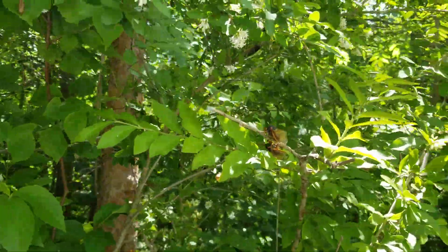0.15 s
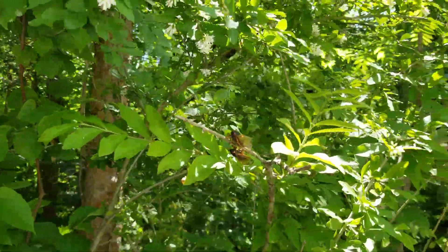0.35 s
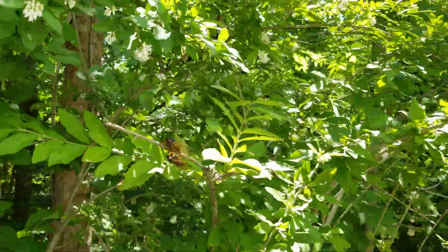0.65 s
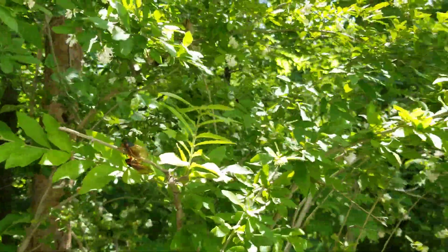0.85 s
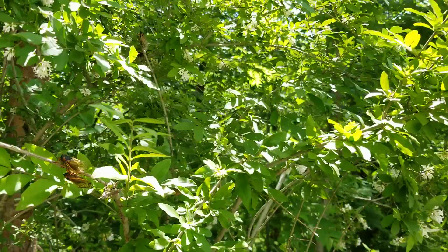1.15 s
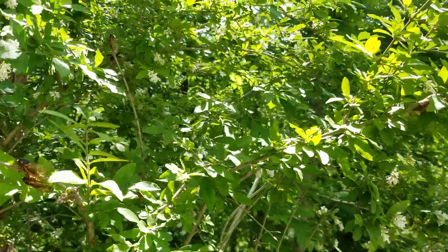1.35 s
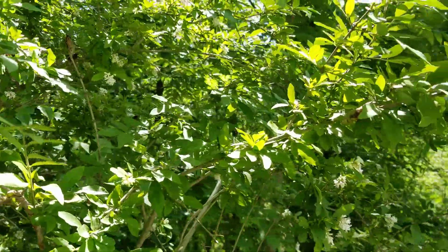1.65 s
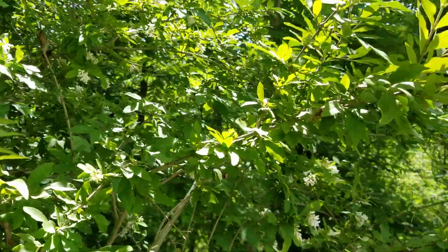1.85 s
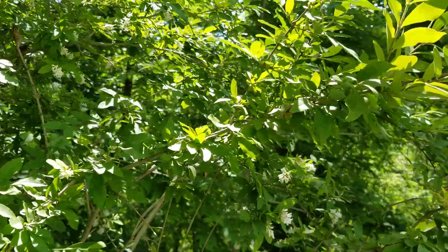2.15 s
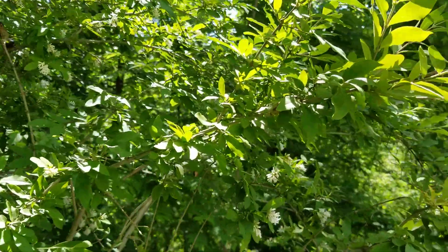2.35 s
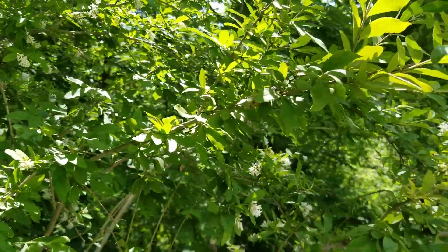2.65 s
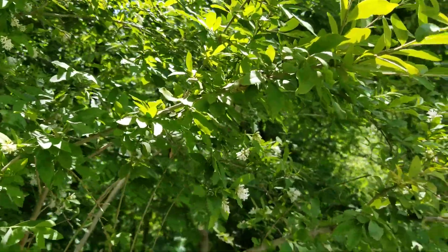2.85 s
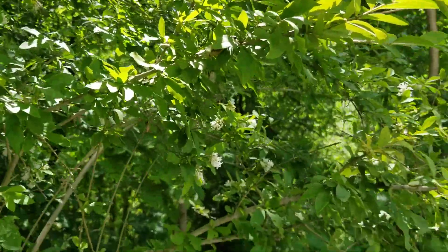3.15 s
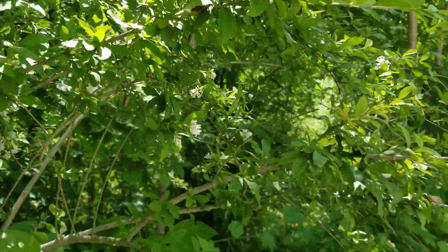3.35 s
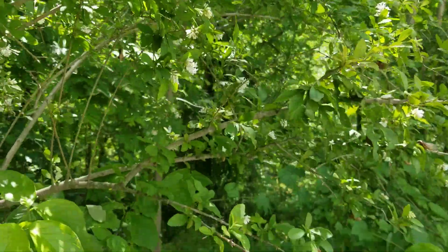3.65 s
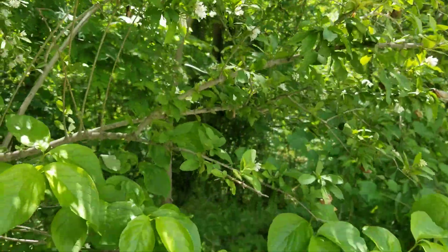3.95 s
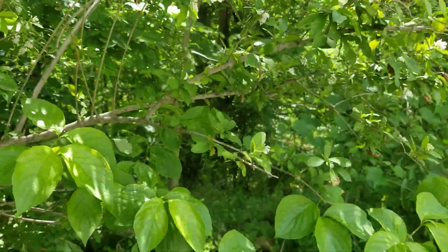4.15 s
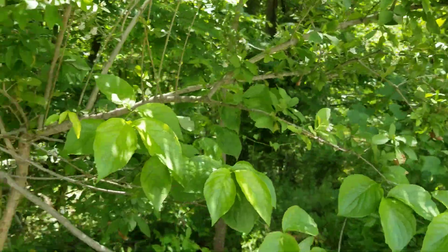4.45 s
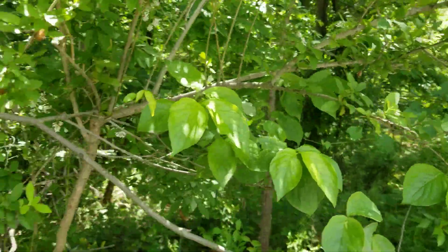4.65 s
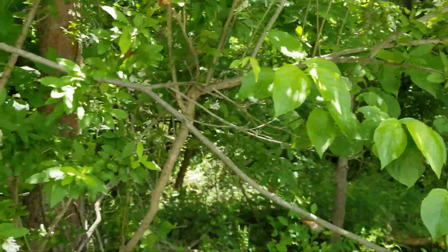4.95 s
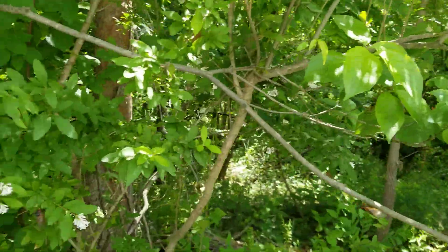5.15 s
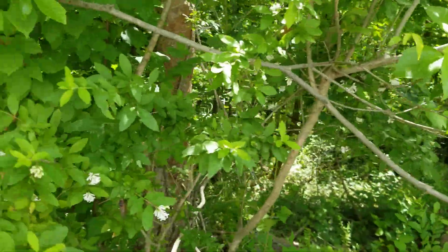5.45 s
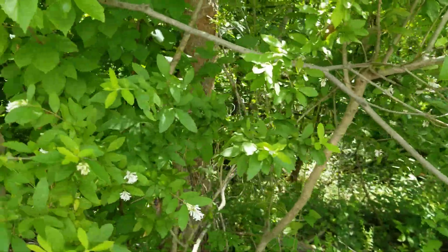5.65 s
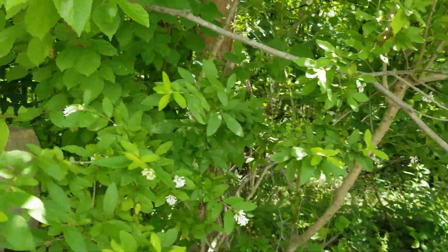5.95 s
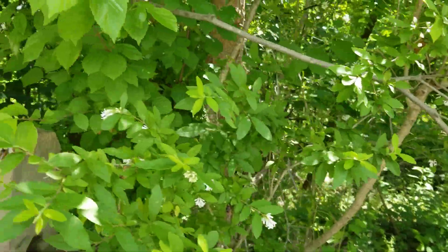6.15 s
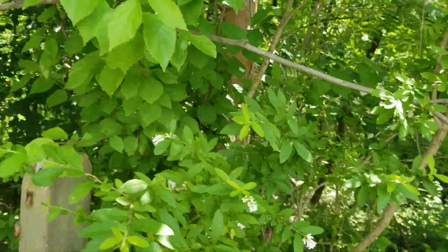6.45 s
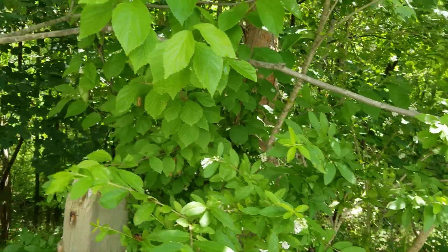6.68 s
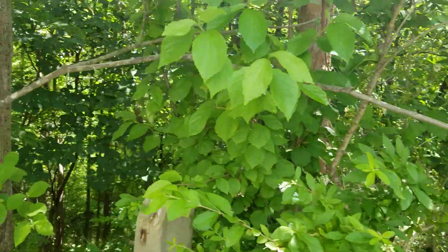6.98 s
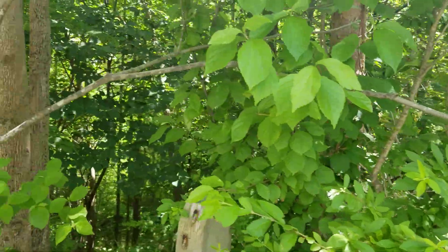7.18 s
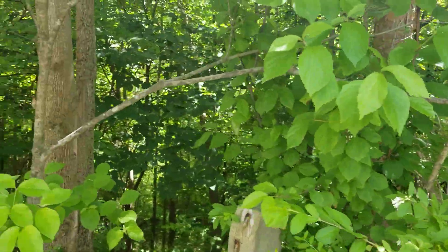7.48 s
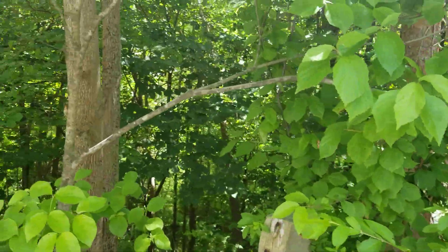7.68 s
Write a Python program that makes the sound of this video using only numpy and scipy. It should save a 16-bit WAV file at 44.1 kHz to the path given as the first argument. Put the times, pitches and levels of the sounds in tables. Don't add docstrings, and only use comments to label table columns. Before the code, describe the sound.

Summer woods drone with massed cicadas, high and hissy above a steady low hum, while single insects rasp upward and distant road noise slowly grows.

```python
import sys
import numpy as np
from scipy import signal
from scipy.fft import rfft, irfft
from scipy.io import wavfile
from scipy.ndimage import uniform_filter1d

SR = 44100
rng = np.random.default_rng(int(sys.argv[2]) if len(sys.argv) > 2 else 0)


def how_loud(loudness_db):
    steps = np.asarray(loudness_db, float) / 20
    return 10 ** steps


def inscribe(sig):
    pcm = np.round(np.clip(np.atleast_2d(sig).T, -1, 1) * 32767)
    wavfile.write(sys.argv[1], SR, pcm.astype(np.int16))


N = 344862


def evened(x):
    return x / np.sqrt(np.mean(abs(x) ** 2) + 1e-20)


def read(points, hz):
    f, value = np.transpose(points)
    return np.interp(np.log(hz + 1), np.log(f + 1), value)


def played(rows, t):
    s, *columns = np.transpose(rows)
    return [np.interp(t, s, column) for column in columns]


def panned(db):
    return how_loud(np.array([db / 2, -db / 2]))


def resonate(x, hz, width_hz):
    turn = np.exp(2j * np.pi * np.cumsum(hz * np.ones(len(x))) / SR)
    r = np.exp(-np.pi * width_hz / SR)
    smooth = signal.lfilter([(1 - r) ** 2], [1, -2 * r, r * r], x / turn)
    return 2 * (turn * smooth).real


def surround(colour_db, patchy_db, patch_hz, patch_s, size=1024):
    port_gap_m, lean = 0.141, 0.13
    hop = size // 4
    hz = np.fft.rfftfreq(size, 1 / SR)
    frames = N // hop + 5
    a, b, c, d, patches = rng.standard_normal((frames, len(hz), 5)).T
    patches = uniform_filter1d(patches, max(1, round(patch_hz * size / SR)), axis=0)
    patches = evened(uniform_filter1d(patches, max(1, round(patch_s * SR / hop)), axis=1))
    side = np.cos(np.linspace(0, np.pi, 64))
    lag = 2 * np.pi * hz[:, None] * port_gap_m / 343 * side
    same = 0.98 * np.mean((1 + lean * side) * np.exp(1j * lag), 1, keepdims=True)
    left = a + 1j * b
    right = same * left + np.sqrt(1 - np.minimum(abs(same), 1) ** 2) * (c + 1j * d)
    field_db = colour_db(hz[:, None], np.arange(frames) * hop / SR) + patchy_db * patches
    spectrum = np.array([left, right]) * how_loud(field_db)
    return evened(signal.istft(spectrum, nperseg=size, noverlap=size - hop)[1][:, :N])


def traffic(t):
    # (time [s], level [dB])
    nearing = [(0.0, -46), (1.9, -46.5), (2.9, -43.5), (4.6, -42.5), (6.1, -42), (6.8, -41), (7.1, -37.5),
               (7.82, -38)]
    # (frequency [Hz], level [dB per Hz])
    rumble_body = [(20, -28), (35, -29), (48, -5.5), (62, -7), (77, -1.5), (100, -5), (125, -8), (200, -13),
                   (300, -21), (500, -32), (900, -90)]
    # (frequency [Hz], level [dB per Hz])
    hiss_body = [(150, -16.5), (300, -3), (500, -8), (800, -0.5), (1100, -0.5), (1800, -4), (3000, -16),
                 (6000, -15), (16000, -32.5)]
    rumble_db, = played(nearing, t)
    hiss_db = -42.5 + 0.45 * (rumble_db - rumble_db[0])
    rumble = surround(lambda hz, s: read(rumble_body, hz), patchy_db=1.2, patch_hz=30, patch_s=0.3, size=4096)
    hiss = surround(lambda hz, s: read(hiss_body, hz), patchy_db=0.58, patch_hz=300, patch_s=0.11)
    return how_loud(rumble_db) * rumble + how_loud(hiss_db) * hiss


def low_chorus(t):
    # (time [s], level [dB])
    waver = [(0.0, -35), (2.2, -35.5), (3.3, -36.5), (4.0, -34.5), (4.8, -37.5), (5.6, -36), (6.6, -36.5),
             (7.82, -33)]
    # (frequency [Hz], level [dB per Hz])
    body = [(560, -37.5), (950, -21.5), (1070, -16), (1290, 1.5), (1330, 6), (1380, -2), (1460, -7),
            (1620, -19.5), (1900, -30), (2470, -32), (4180, -120)]
    level_db, = played(waver, t)
    hum = surround(lambda hz, s: read(body, hz), patchy_db=-1.0, patch_hz=60, patch_s=0.2)
    return how_loud(level_db + 4.0) * panned(0.7)[:, None] * hum


def shrill_chorus(t):
    # (time [s], level [dB])
    swell = [(0.0, -44), (1.3, -43), (1.7, -43.5), (2.15, -44), (2.7, -45.5), (3.8, -45), (4.62, -43.5),
             (4.85, -48), (5.5, -47.5), (6.15, -49.5), (7.0, -48), (7.7, -45.5), (7.82, -46.5)]
    # (frequency [Hz], level [dB per Hz])
    body = [(1650, -38.5), (2800, -26), (3210, -20.5), (4040, -5.5), (4470, -7), (5310, -2), (5740, 0.5),
            (6390, -2), (9160, -32.5), (12300, -23), (15600, -38.5)]
    level_db, = played(swell, t)

    def colour_db(hz, s):
        return read(body, hz) - np.clip((hz - 8000) / 2500, 0, 1)

    band = surround(colour_db, patchy_db=0.72, patch_hz=400, patch_s=0.12)
    return how_loud(level_db + 17.0) * panned(-1)[:, None] * band


def ticks():
    # (time [s], peak level [dB], left-right difference [dB])
    taps = [
        (2.6181, -38, 10),
        (3.9669, -37, 5.5),
        (6.2811, -26, 9),
    ]
    out = np.zeros((2, N))
    t = np.arange(200) / SR
    for (s, db, pan_db), crack in zip(taps, rng.standard_normal((len(taps), 200))):
        tick = crack * np.exp(-t / 0.0012)
        out[:, round(s * SR):][:, :200] += how_loud(db - 6) * panned(pan_db - 1.0)[:, None] * tick
    return out


TAIL_S = 0.28


def posture(t, length, peak_db, top_hz):
    lift_s, drop_s = 0.34, 0.059
    rest_hz, rest_db = 4520, -10.5
    after = np.maximum(t - length, 0)
    rising = 1 - np.exp(-np.minimum(t, length) / lift_s)
    dropping = np.exp(-after / drop_s)
    lift = rising * dropping
    effort_db = peak_db - 20.5 * np.exp(-t / 0.054) - 2.5 * np.exp(-t / lift_s) - 64 * after
    beats = 204.0 * (1 - 0.04 * t - 0.088 * (1 - dropping))
    sac_hz = rest_hz + (top_hz - rest_hz) * lift
    return effort_db, sac_hz, beats, rest_db + 20 * lift


def cicada(start, length, peak_db, top_hz, rib_hz, rough):
    t = np.arange(0, length + TAIL_S, 1 / SR)
    effort_db, sac_hz, beats, sac_db = posture(t, length, peak_db, top_hz)
    jitter, noise, sizes = rng.standard_normal((3, 2 * SR))[:, :len(t)]

    snaps = 2 * np.cumsum(beats * (1 + 0.0564 * uniform_filter1d(jitter, 200))) / SR
    nth = (snaps + 0.6).astype(int)
    strength = np.where(nth % 2, -0.12, 1) * how_loud(1.0 * sizes[nth])
    clicks = evened(strength * np.exp(-((snaps % 1 - 0.5) / 0.009) ** 2))
    rasp = evened(strength * (0.2 + np.exp(-((snaps + 0.5) % 1) / 0.46)) * noise)
    drive = evened(np.diff(clicks, prepend=0)) + rough * rasp

    def ring(x, hz, width_hz):
        return evened(resonate(resonate(x, hz, width_hz), hz, width_hz))

    ribs = ring(drive, np.minimum(rib_hz, sac_hz), width_hz=1340)
    between = ring(drive, (rib_hz + sac_hz) / 2, width_hz=1540)
    sac = ring(drive, sac_hz, width_hz=710)
    overtone = ring(rasp, np.maximum(1.96 * sac_hz, 11300), width_hz=3100)
    edge = ring(rasp, 14700, width_hz=4300)

    dip = how_loud(-2.5) * np.clip((sac_hz - rib_hz) / 1000, 0, 1) * between
    sac_voice = sac + how_loud(-17.5) * overtone + how_loud(-23.5) * edge
    voice = ribs - dip + how_loud(sac_db) * sac_voice
    out = np.zeros(N)
    out[round(start * SR):][:len(t)] = how_loud(effort_db - 7.5) * voice / np.sqrt(1 + how_loud(2 * sac_db))
    return out


def foliage(x, pan_db, wet_db, t60):
    t = np.arange(12000) / SR
    path = rng.standard_normal((2, 12000)) * how_loud(-60 * t / t60) * np.clip(t / 0.0031, 0, 1)
    path *= how_loud(wet_db) / np.linalg.norm(path, axis=1, keepdims=True)
    path[[0, 1], [17, 0]] = 1
    return panned(pan_db)[:, None] * signal.oaconvolve(x[None], path, axes=1)[:, :N]


def scene():
    # (start [s], sung length [s], effort [dB], highest sac pitch [Hz], rib pitch [Hz])
    songs = [
        (0.67, 0.76, -24, 6540, 5050),
        (3.81, 0.85, -26, 6470, 4950),
        (1.30, 0.47, -35, 6300, 5660),
    ]
    t = np.arange(N) / SR
    background = traffic(t) + low_chorus(t) + shrill_chorus(t) + ticks()
    first = foliage(cicada(*songs[0], rough=1.0), pan_db=0.0, wet_db=2, t60=0.32)
    second = foliage(cicada(*songs[1], rough=1.2), pan_db=0.8, wet_db=3.0, t60=0.25)
    answer = foliage(cicada(*songs[2], rough=0.96), pan_db=-3.0, wet_db=7.5, t60=0.25)
    return background + answer + first + second


def top_cut(x):
    return signal.sosfilt(signal.butter(12, 15830, fs=SR, output="sos"), x)


def record(dry):
    # (frequency [Hz], left-right difference [dB])
    balance = [(60, 3), (110, 1.5), (200, 1), (380, 2.5), (700, 2.5), (1290, 0), (2380, 2), (4400, 5),
               (8120, 7.5), (15000, 0.5)]
    ports = panned(read(balance, np.fft.rfftfreq(N, 1 / SR)))
    mix = irfft(rfft(dry) * ports, N)
    return top_cut(mix)


dry = scene()
out = record(dry)
inscribe(out)
```